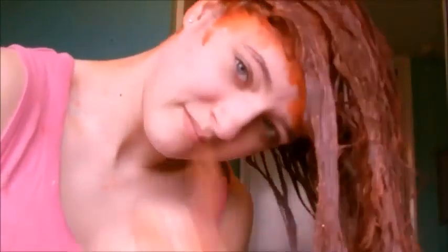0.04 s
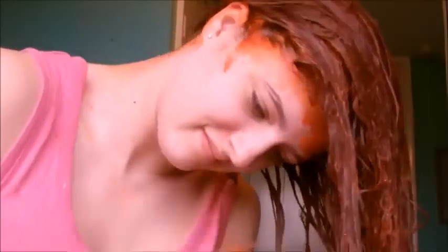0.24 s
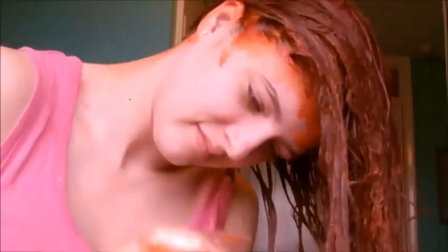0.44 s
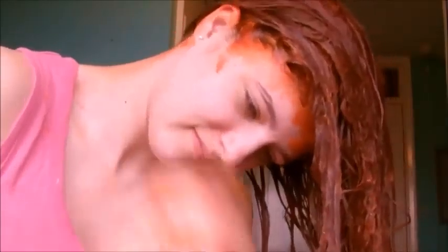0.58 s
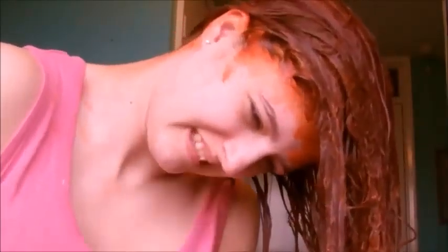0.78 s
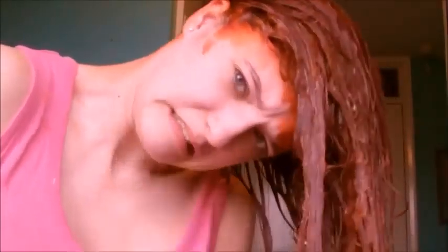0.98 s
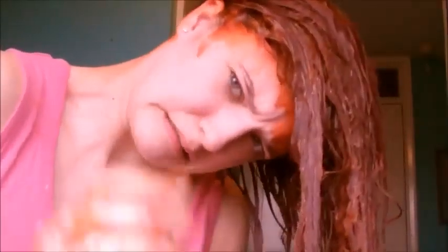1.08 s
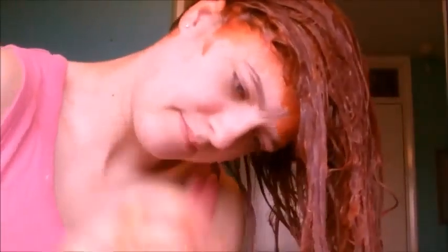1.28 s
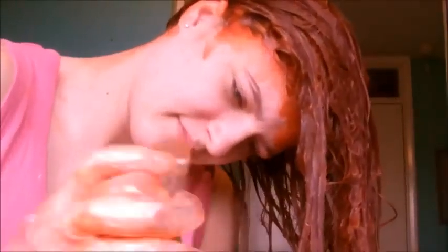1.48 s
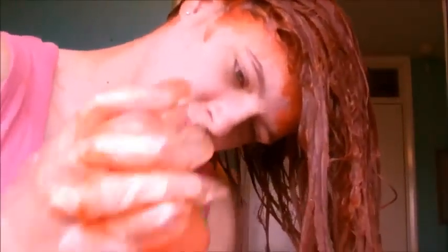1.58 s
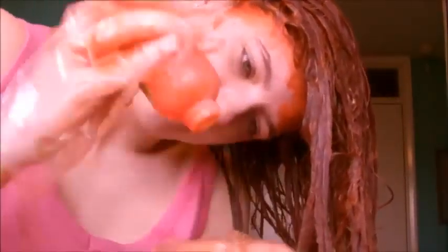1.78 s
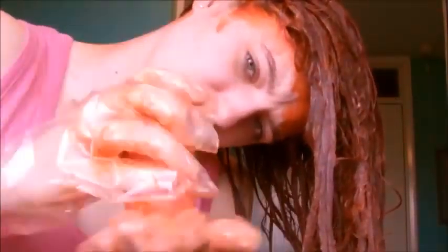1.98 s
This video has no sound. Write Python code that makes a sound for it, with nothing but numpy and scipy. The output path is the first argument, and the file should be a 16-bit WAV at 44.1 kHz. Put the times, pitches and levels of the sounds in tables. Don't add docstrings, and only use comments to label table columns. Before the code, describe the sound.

A plastic squeeze bottle of liquid is shaken fast, with hollow knocks, clicks and bright spray hiss about every 0.04 seconds. A tiny gap comes near 0.35, then shaking continues from 0.43 to 1.47, with a glove crinkle strongest around 1.1. After a pause with faint creases, five slower slaps fall from 1.68 to 2.0. Close microphone, short tiled bathroom reflections, faint fan hum and low rumble.

```python
import sys
import numpy as np
from scipy import signal
from scipy.fft import rfft, irfft
from scipy.io import wavfile
from scipy.ndimage import uniform_filter1d

SR = 44100
rng = np.random.default_rng(int(sys.argv[2]) if len(sys.argv) > 2 else 0)


def decibels_to_gain(level_db):
    exponent = np.asarray(level_db, float) / 20
    return 10 ** exponent


def transcribe(signal):
    frames = np.atleast_2d(signal).T
    limited = np.clip(frames, -1, 1)
    pcm = np.round(limited * 32767).astype(np.int16)
    wavfile.write(sys.argv[1], SR, pcm)


N = 90228
BLOW_N = 6144
OPPOSITE = np.array([[1], [-1]])

# f/Hz, level/dB, time to fade by 60 dB/s
BODY = [(690, -9, .07), (800, -6, .07), (990, -7, .06), (1125, -4, .07), (1265, -5, .05), (1450, -5, .03),
        (1633, -1, .07), (1732, 1, .07), (1895, -2, .045), (2150, -2, .045), (2480, -5, .02)]


def unit(x):
    return x / np.sqrt(np.mean(x ** 2))


def through(x, h):
    return signal.fftconvolve(np.atleast_2d(x), np.atleast_2d(h), axes=-1)[:, :x.shape[-1]]


def add(out, start_s, x):
    i = max(int(start_s * SR), 0)
    out[..., i:i + x.shape[-1]] += x[..., :N - i]


def filtered(x, order, hz, kind="low"):
    return signal.sosfilt(signal.butter(order, hz, kind, fs=SR, output="sos"), x)


def colour(x, points):
    hz, db = np.array(points, float).T
    bins_hz = np.arange(1025) * SR / 2048
    log_gain = np.interp(np.log(bins_hz + 1), np.log(hz), db) * np.log(10) / 20
    cepstrum = irfft(log_gain)
    cepstrum[1:1024] *= 2
    cepstrum[1025:] = 0
    h = irfft(np.exp(rfft(cepstrum)))
    return through(x, unit(h) / np.sqrt(len(h)))


def ring(x, modes, scatter_db, drift):
    t = np.arange(4096) / SR
    chance = rng.standard_normal((len(modes), 2))
    h = np.zeros(len(t))
    for k, ((hz, db, t60), (louder, higher)) in enumerate(zip(modes, chance)):
        tone = np.sin(2 * np.pi * hz * (1 + drift * higher) * t)
        h += (-1) ** k * decibels_to_gain(db + scatter_db * louder) * 1000 ** (-t / t60) * tone
    return through(x, h / np.sqrt(np.sum(h ** 2)))


def grains(size, spread_db):
    return unit(rng.standard_normal(size) * decibels_to_gain(spread_db * rng.exponential(size=size)))


def burst(t, fall_s, spread_db):
    rise_s = 0.0016
    shape = (1 - np.exp(-(t / rise_s) ** 2)) * np.exp(-t / fall_s)
    return unit(grains(len(t), spread_db) * shape) * np.sqrt(np.mean(shape ** 2))


def walk(rate_hz):
    k = int(SR / rate_hz)
    steps = np.repeat(rng.standard_normal(N // k + 1), k)
    return unit(uniform_filter1d(uniform_filter1d(steps, k), k)[:N])


def ports(make):
    # f/Hz, level/dB
    side_tilt = [(100, 14), (350, 4.5), (700, -8.5), (1500, -1.5), (8000, 3.5), (15000, 7)]
    side_db = -12.5
    return make() + decibels_to_gain(side_db) * colour(make(), side_tilt) * OPPOSITE


def echoes():
    # delay/s, level/dB
    surfaces = [
        (.0014, -9.5),
        (.0029, -12.5),
        (.0052, -15.5),
    ]
    h = np.zeros(BLOW_N)
    for (late_s, db), chance in zip(surfaces, rng.standard_normal(len(surfaces))):
        add(h, late_s * (1 + 0.053 * chance), np.array([decibels_to_gain(db)]))
    return h


def tail():
    t = np.arange(BLOW_N) / SR
    rise_s, t60_s, treble_t60_s = 0.0021, 0.096, 0.054
    noise = rng.standard_normal(len(t)) * (1 - np.exp(-t / rise_s))
    low = filtered(noise, 2, 3500)
    h = low * 1000 ** (-t / t60_s) + (noise - low) * 1000 ** (-t / treble_t60_s)
    return h / np.sqrt(np.sum(h ** 2))


def fan_hum():
    # f/Hz, width/Hz, level/dB
    duct_modes = [(1265, 140, -3), (2170, 170, 0), (2480, 140, -6)]
    # f/Hz, level per Hz/dB
    air_tone = [(30, -22.5), (300, -23.5), (700, -17), (1300, -11), (2300, -14.5), (3600, -10),
                (8000, -19.5), (15500, -4)]
    fan_db, air_db, side_db = -69.5, -64, -13.5

    def one():
        duct = 0
        for hz, width, db in duct_modes:
            b, a = signal.iirpeak(hz, hz / width, SR)
            duct = duct + decibels_to_gain(db + walk(28.04)) * unit(signal.lfilter(b, a, rng.standard_normal(N)))
        air = colour(rng.standard_normal(N), air_tone)
        return decibels_to_gain(fan_db) * duct + decibels_to_gain(air_db + 1.9 * walk(23.2)) * air

    return one() + decibels_to_gain(side_db) * one() * OPPOSITE


def rumble():
    deep = filtered(rng.standard_normal((2, N)), 2, 160)
    return decibels_to_gain(-106 + 1.9 * walk(18)) * unit(deep)


def knocks():
    # t/s, knock peak level/dB, puff level/dB, deep tones level/dB
    blows = [(0.0, -35, -84, 3), (0.046, -38, -93, 2), (0.091, -37.5, -82, 5), (0.136, -35.5, -78, 4.5),
             (0.185, -34.5, -83, -2), (0.231, -39.5, -86, -1), (0.276, -36.5, -77.5, -1),
             (0.32, -45.5, -99, 3), (0.433, -35, -84, -20), (0.478, -44, -86, 3), (0.525, -51, -92, -5),
             (0.571, -42.5, -79, -2), (0.615, -36.5, -89, 2.5), (0.625, -37.5, -96, 0),
             (0.658, -38, -85, 6.5), (0.698, -45.5, -86, 5), (0.736, -42.5, -79.5, 7.5),
             (0.774, -32.5, -89, 3.5), (0.81, -36.5, -93, 1.5), (0.847, -39, -84, 6),
             (0.886, -39, -79, 8.5), (0.924, -43.5, -84, 7), (0.964, -36, -91, 7), (1.008, -36, -81.5, 5.5),
             (1.049, -34.5, -94, -1), (1.09, -41.5, -81, 5), (1.127, -37, -82.5, 8), (1.168, -32.5, -86, 3),
             (1.211, -42.5, -87, 7), (1.254, -35.5, -92, 1), (1.296, -42, -87, 6), (1.336, -36, -88, 0),
             (1.378, -34.5, -78, 0), (1.422, -33, -88, 5), (1.432, -34, -96, -0.5), (1.464, -34.5, -86, -1),
             (1.677, -38.5, -90, -8.5), (1.69, -44.5, -86, -10), (1.748, -34.5, -83, 1),
             (1.831, -38.5, -84.5, -10), (1.91, -36, -91, -7.5), (1.994, -34.5, -84.5, -2)]
    # f/Hz, level/dB, time to fade by 60 dB/s
    end_modes = [(507, -10.5, 0.0082), (847, -1, 0.0054), (1150, -2, 0.0098), (1766, 0.5, 0.014),
                 (2180, 2, 0.0041), (3890, -15, 0.0035)]
    knock_db, body_db, tiles_db, late_s = -1.5, -9, -6, 0.0007
    puff_gain_db, puff_s, puff_side = 15, 0.00033, 0.72
    out, t = np.zeros((2, N)), np.arange(BLOW_N) / SR
    click = 1. * (t == 0)
    tiles = ports(tail)
    for s, db, puff_db, deep_db in blows:
        blow = ring(click, end_modes, scatter_db=1.77, drift=0.045)
        blow = blow + decibels_to_gain(body_db) * ring(click, BODY, scatter_db=1.5, drift=0.004)
        blow = blow + (decibels_to_gain(deep_db) - 1) * filtered(blow, 2, 1300)
        blow = blow / np.abs(blow).max()
        wet = blow + through(blow, ports(echoes)) + decibels_to_gain(tiles_db) * through(blow, tiles)
        knock = decibels_to_gain(knock_db + db) * filtered(wet, 3, 384, "high")
        side = 1 + puff_side * rng.standard_normal() * OPPOSITE
        puff = decibels_to_gain(puff_gain_db + puff_db) * np.e * t / puff_s * np.exp(-t / puff_s) * side
        add(out, s + late_s, knock + puff)
    return out


def bottle():
    slaps = [
        (.0003, -26.5, -8, -11, -4),
             (.0463, -33, -5.5, -5, 0),
        (.0912, -25.5, -9.5, -25, -7),
        (.1371, -19, -16.5, -14.5, -12),
        (.1862, -24.5, -11.5, -10.5, -5),
        (.2319, -22, -16.5, -17.5, -11.5),
        (.2768, -22, -15, -23, -5),
        (.3197, -26, -5.5, -26, -5.5),
             (0.4324, -25, -11.5, -10, -13.5), (0.4781, -31, -8, -15, -5.5), (0.5238, -27, -12, -30, -10),
               (0.5715, -31, -9.5, -6.5, -5), (.615, -22.5, -17, -13.5, -9), (.6579, -27.5, -10, -12, -6.5),
               (.6983, -31, -6, -16, -2.5), (.7362, -22.5, -15, -31, -10), (.7741, -19, -18.5, -20, -14),
               (0.8096, -25.5, -10, -17, -4.5), (0.8488, -27.5, -9.5, -5, -5.5),
               (.8864, -21.5, -12.5, -10.5, -10.5), (0.9241, -24.5, -15, -32, -13),
               (.9642, -22, -16, -28, -11),
             (1.0083, -23.5, -10, -20, -5.5), (1.049, -19, -13.5, -25, -9.5),
               (1.0895, -22, -12.5, -11, -9), (1.1273, -21, -12.5, -9, -8), (1.168, -29, -7.5, -19, -2.5),
               (1.2101, -27, -12, -7.5, 5), (1.2545, -20, -19, -16, -8), (1.2965, -23.5, -10, -13, -7.5),
               (1.3362, -22, -14.5, -16, -10), (1.3783, -24, -12.5, -10, -7.5),
               (1.4227, -20.5, -15, -11, -10.5), (1.4647, -20.5, -14.5, -20, -9),
             (1.6771, -32, -8, -10, -3),
        (1.7485, -18.5, -17, -21.5, -16.5),
        (1.8308, -20.5, -17.5, -23.5, -13),
        (1.9103, -21.5, -14.5, -32, -14),
        (1.9942, -18.5, -15.5, -24, -13),
    ]
    # f/Hz, level/dB, time to fade by 60 dB/s
    wall_modes = [(5600, -5, .006), (6500, 0, .008), (7350, 6, .01), (8240, 11, .01), (8860, 12, .01),
                  (10460, 2, .006), (11400, 10, .006), (12800, 13, .007), (14270, 17, .009),
                  (14600, 12, .008), (15300, 15, .005)]
    # f/Hz, level per Hz/dB
    spray_tone = [(330, -21.5), (480, -11.5), (800, -15), (1800, -4.5), (3300, -8.5), (5000, -5),
                  (8300, 4.5), (15500, 1)]
    snap_late_s, snap_s, snap_db = 0.0025, 0.0001, -1.5
    wall_db, body_gain_db, splash_gain_db = -7.5, -17.5, 9
    out, t = np.zeros((2, N)), np.arange(BLOW_N) / SR

    def splashing():
        slap = decibels_to_gain(-6) * burst(t, fall_s=0.0031, spread_db=1.5)
        spray = decibels_to_gain(-11.5) * burst(t, fall_s=0.011, spread_db=1.8)
        return slap + spray + decibels_to_gain(10) * tail()

    for s, db, splash_db, body_db, top_db in slaps:
        snap = decibels_to_gain(snap_db) * np.exp(-np.abs(t - snap_late_s) / snap_s) * rng.choice([-1., 1.], len(t))
        snap = signal.lfilter([1, -0.5], [1], snap)
        splash = decibels_to_gain(splash_gain_db + splash_db) * ports(splashing)
        push = snap + through(snap, ports(echoes)) + splash
        wall = ring(push, wall_modes, scatter_db=3.5, drift=0.008)
        bright = decibels_to_gain(wall_db) * wall + colour(push, spray_tone)
        low = filtered(bright, 2, 6150)
        top = decibels_to_gain(top_db - splash_db - 8)
        bright = (low + top * (bright - low)) * np.sqrt(2 / (1 + top ** 2))
        body = ring(push - snap, BODY, scatter_db=1.5, drift=0.004)
        body = decibels_to_gain(body_gain_db + body_db - splash_db) * body
        add(out, s - .0012, decibels_to_gain(db) * filtered(bright + body, 4, 412, "high"))
    return out


def glove():
    # t/s, crinkle level/dB
    grip = [(0, -84.5), (.3, -75.5), (.55, -81.5), (.85, -70.5), (.99, -76.5), (1.03, -70), (1.11, -59),
            (1.2, -62), (1.25, -69.5), (1.28, -76), (1.45, -90), (1.62, -80.5), (1.67, -75), (1.75, -83),
            (2.04, -78.5)]
    # t/s, peak level/dB
    folds_and_rebound = [
        (1.1087, -16.5),
        (1.1198, -19),
        (1.4323, -18),
    ]
    # t/s, peak level/dB
    creases = [(.312, -46), (.3965, -52), (1.506, -60), (1.5374, -56), (1.589, -56), (1.6277, -54),
               (1.6487, -56), (1.6601, -46), (1.71, -56), (1.735, -54), (1.9026, -54), (2.016, -44)]
    # f/Hz, level/dB
    crinkle_tone = [(400, -39.5), (1200, -19), (2350, -5), (3300, -10), (4900, -17.5), (5600, 2),
                    (9200, -2.5), (12000, -20)]
    # f/Hz, level/dB
    tick_tone = [(2000, -30), (5000, -10), (8000, 0), (10500, -1), (14000, -3), (16000, -3)]
    t = np.arange(N) / SR
    grip_db = np.interp(t, *np.array(grip).T)
    film = grains(N, spread_db=1.7) * decibels_to_gain(grip_db + 6.5 + 1.2 * walk(61.1))
    ticks = np.zeros(N)
    for layer, events in ((film, folds_and_rebound), (ticks, creases)):
        for s, db in events:
            add(layer, s - .001, decibels_to_gain(db) * burst(t[:600], fall_s=0.00071, spread_db=0.92))
    return colour(film, crinkle_tone) + colour(ticks, tick_tone)


def scene():
    film = glove()
    film_in_room = film + through(film, ports(tail))
    near = fan_hum() + knocks() + bottle() + film_in_room
    left_db = 1.4
    return near * decibels_to_gain(left_db / 2 * OPPOSITE) + rumble()


def roll_off(x):
    return signal.sosfilt(signal.butter(12, 16970, fs=SR, output="sos"), x)


def record(dry):
    def cut(hz):
        return signal.sosfilt(signal.ellip(8, .2, 60, hz, fs=SR, output="sos"), dry)

    shelf_db = -27
    mix = cut(15800) + decibels_to_gain(shelf_db) * cut(16600)
    return roll_off(mix)


dry = scene()
out = record(dry)
transcribe(out)
```